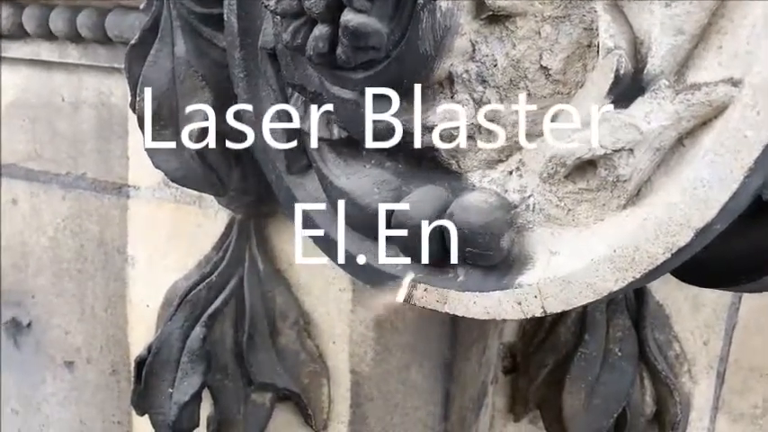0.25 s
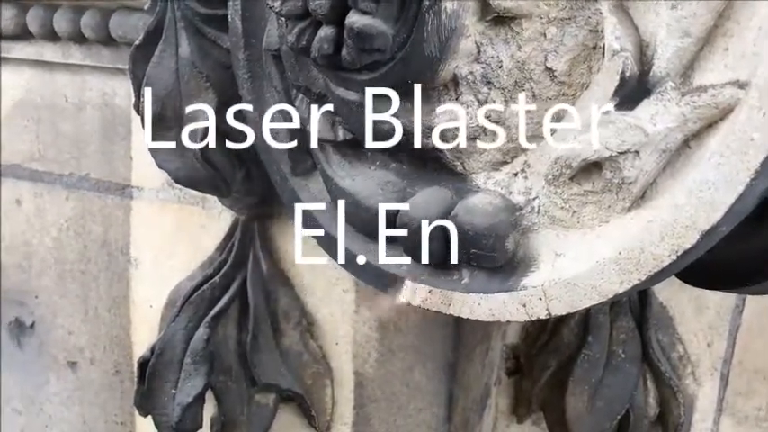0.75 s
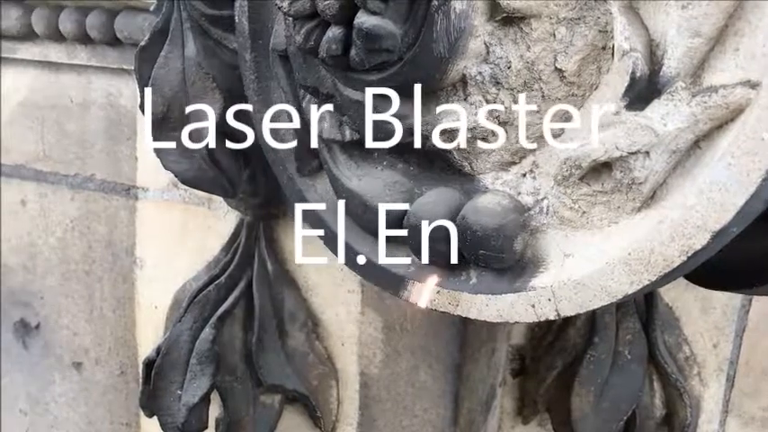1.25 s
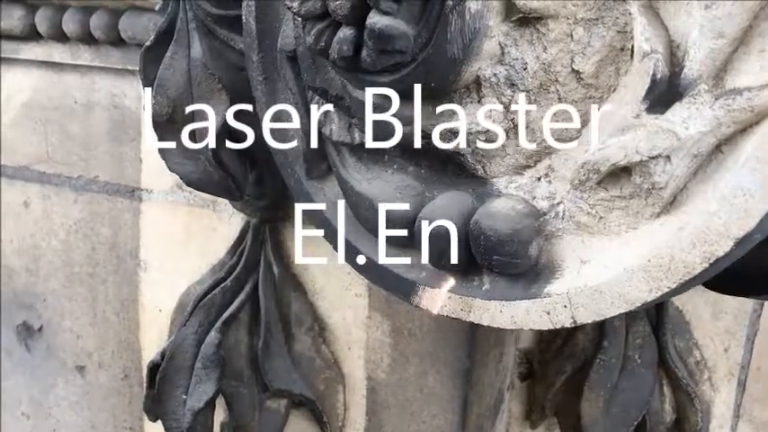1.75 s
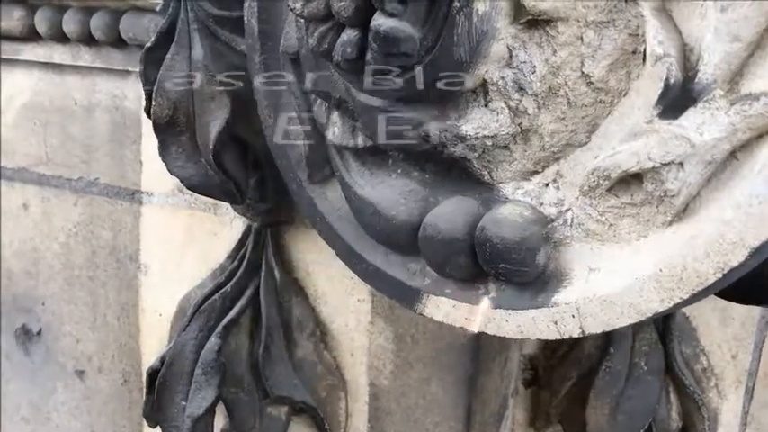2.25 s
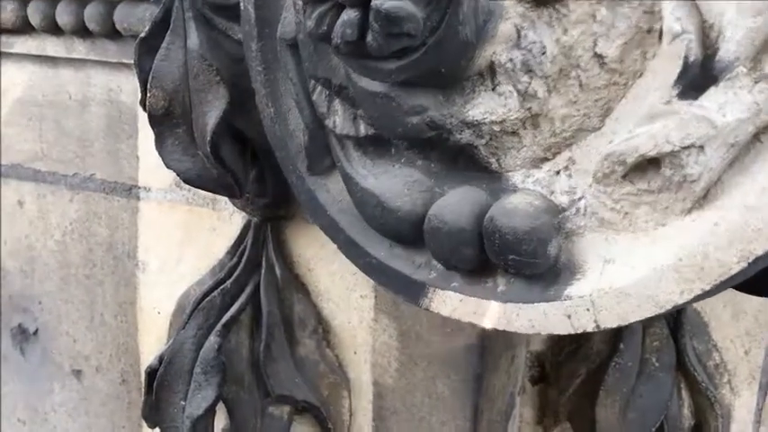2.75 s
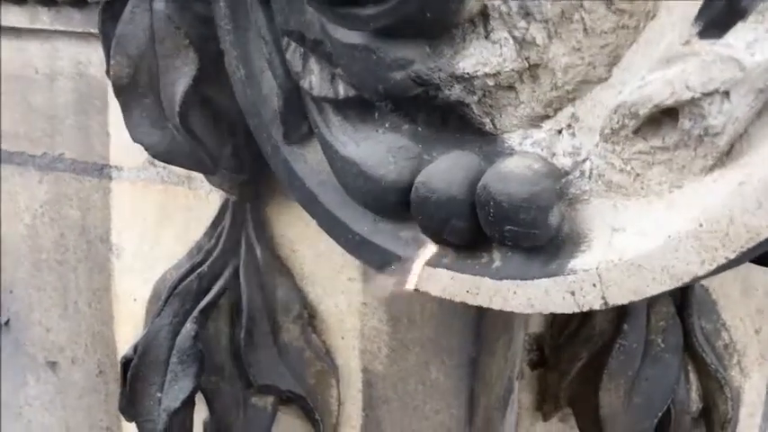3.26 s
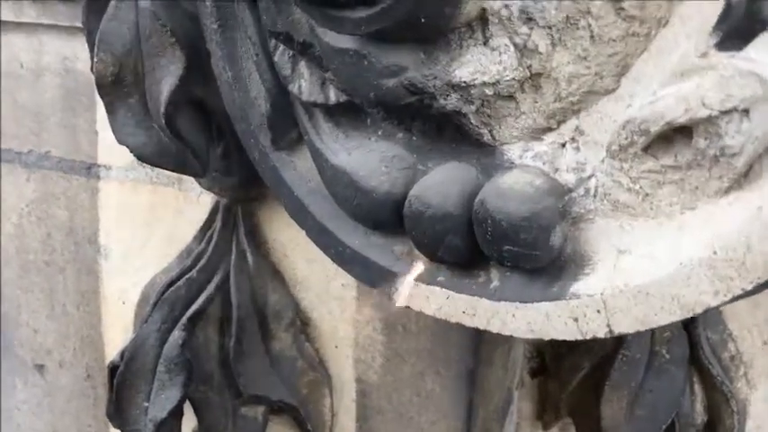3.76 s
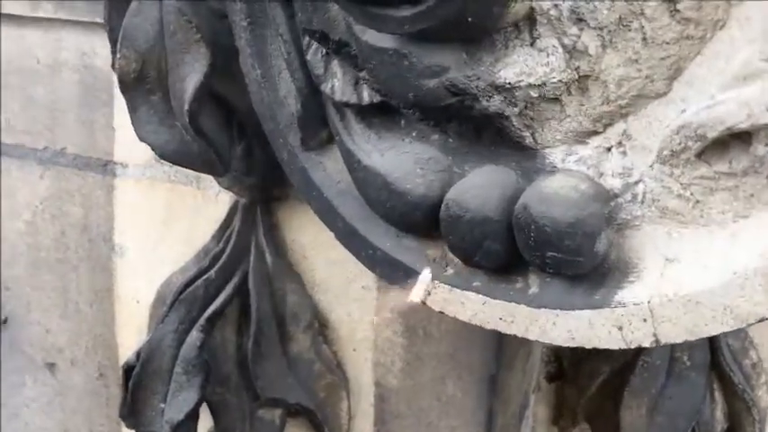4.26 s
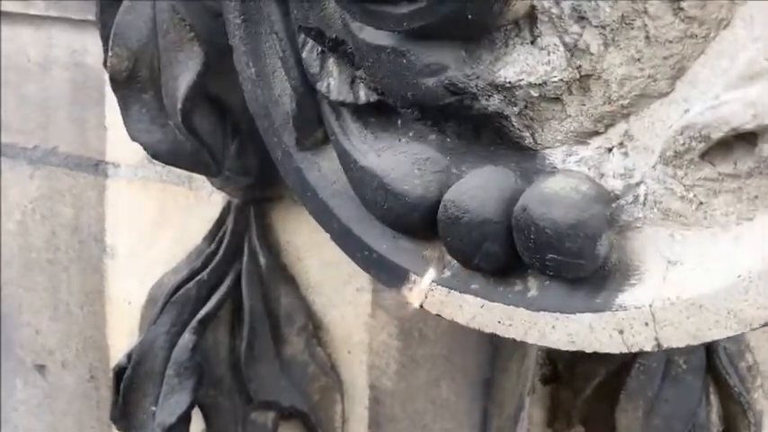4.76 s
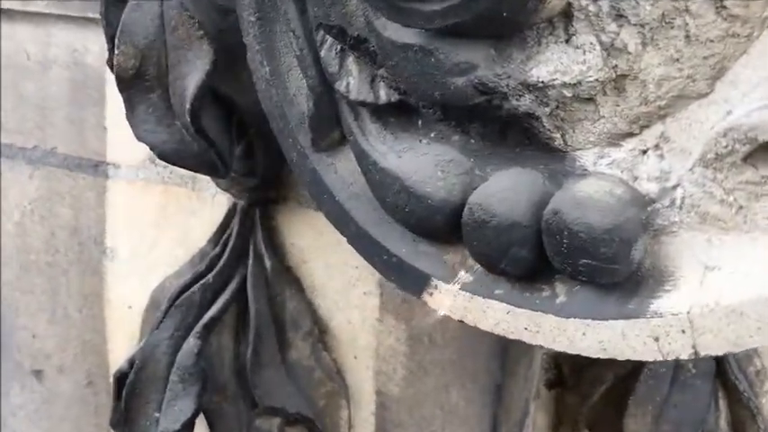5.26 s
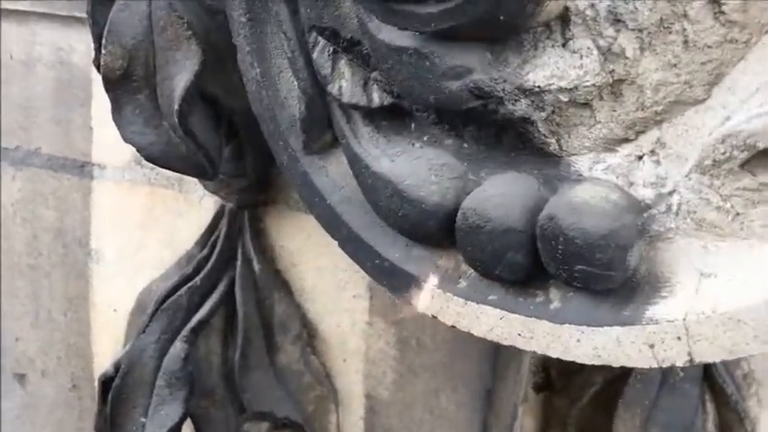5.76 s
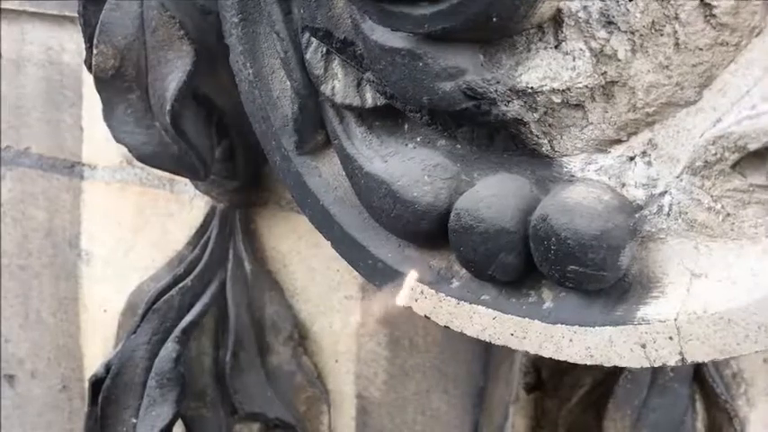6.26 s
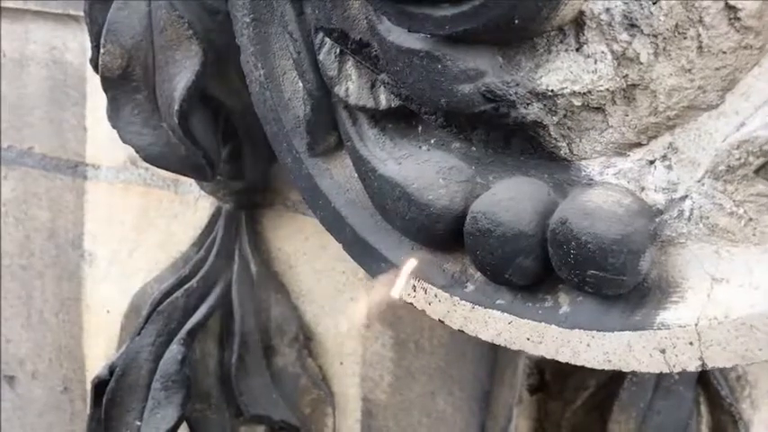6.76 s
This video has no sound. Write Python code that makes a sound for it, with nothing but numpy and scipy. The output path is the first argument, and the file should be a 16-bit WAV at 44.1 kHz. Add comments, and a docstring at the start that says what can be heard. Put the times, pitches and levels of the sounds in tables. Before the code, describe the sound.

Bright, fluttering sizzle and buzz of a laser stripping crust from carved stone outdoors, with occasional snaps and faint street rush.

```python
"""Laser cleaning of a stone facade

A hand-held laser strips soot from a carved rim, outdoors. A mirror sweeps the beam 175 times a second.
Crust bursts off wherever the beam crosses stone, most at the two sooty edges, so the crackle buzzes.
Flakes pop; carvings and wall echo. Behind: low hum of the burn at the sweep rate, a thin whine,
dull bumps, street rush."""
import sys
import numpy as np
from scipy import signal
from scipy.fft import rfft, irfft, next_fast_len
from scipy.io import wavfile
from scipy.ndimage import uniform_filter1d, map_coordinates

SR = 44100
rng = np.random.default_rng(int(sys.argv[2]) if len(sys.argv) > 2 else 0)


def file_out(sig):
    """Save sig as 16-bit WAV at sys.argv[1]."""
    # one column per channel
    cols = np.atleast_2d(sig).T
    # limit, then scale
    lim = np.clip(cols, -1, 1)
    pcm = np.round(lim * 32767).astype(np.int16)
    wavfile.write(sys.argv[1], SR, pcm)


N = 309582
TIME = np.arange(N) / SR
SCAN_HZ, FLUTTER_HZ = 175.0, 24.3
SWEEP_RAD = 2 * np.pi * SCAN_HZ * TIME
RIM_WIDTH = 1.58  # scan line spans -1..1
THICK_CRUST_DB = -23.5  # reference for BURST

# Burst strength of the crust: t/s, level/dB
BURST = [(0.0, -27.5), (0.43, -27.5), (0.6, -24), (0.91, -29.5), (1.13, -23), (1.19, -25), (1.215, -26.5),
         (1.29, -23.5), (1.315, -22.5), (1.45, -26.5), (1.54, -22.5), (1.645, -24.5), (1.665, -27.5),
         (1.73, -29), (1.88, -28.5), (1.95, -25), (2.16, -26.0), (2.7, -25.5), (2.76, -24), (2.86, -23.5),
         (2.93, -27), (3.23, -25), (3.3, -28.5), (3.41, -24.5), (3.65, -25), (3.73, -31), (3.86, -25),
         (3.98, -26.5), (4.06, -33), (4.43, -27), (4.455, -29), (4.54, -30.5), (4.67, -25.5), (5.14, -35.5),
         (5.24, -34.5), (5.33, -33), (5.445, -39), (5.465, -43), (5.532, -49), (5.545, -36), (6.32, -23),
         (7.01, -23)]
# Crackle treble: t/s, gain/dB
TREBLE = [(0, 2.5), (1, 2.5), (2.6, -0.5), (2.85, 1.5), (3, 1), (3.35, 0.5), (3.65, 0.5), (4.1, -1.5),
          (5.5, -2.5), (6.4, -7.5), (6.9, -2)]
# Hand aim: t/s, outer edge position on the scan line
AIM = [(0.0, -0.891), (0.45, -0.83), (0.87, -0.494), (1.03, -0.903), (1.25, -0.47), (1.44, -0.831),
       (1.61, -0.323), (1.76, -0.904), (1.81, -0.945), (2.12, -0.723), (2.39, -0.797), (2.52, -0.709),
       (2.68, -0.821), (2.87, -0.417), (3.05, -0.926), (3.15, -0.964), (3.37, -0.958), (3.57, -0.74),
       (3.84, -0.84), (3.98, -0.761), (4.13, -0.964), (4.34, -0.491), (4.61, -0.307), (5.09, -0.756),
       (5.29, -0.692), (5.5, -0.825), (5.68, -0.778), (5.85, -0.449), (6.12, -0.385), (7.01, -0.685)]
# Flutter shift of the edge crossings: t/s, amplitude/rad
SWAY = [(0, 0.063), (2.3, .06), (3.5, 0.045), (4.4, .022), (7.02, .018)]
# Edge soot relative to beam entry: t/s, exit share, inner edge share
SOOT = [(0, 0.35, 0.59), (1.1, 0.64, 0.45), (1.4, 0.32, 0.45), (4.1, 0.52, 0.58), (4.5, 0.28, 0.32),
        (7.02, .3, 0.34)]
# Place along the rim: t/s, index (0 start, 1 early, 2 middle, 3 end)
PLACE = [(0, 0.5), (1.55, -0.5), (2.05, 1), (2.88, 1), (3.05, 2), (4.5, 3), (6.2, 3), (7.02, 3)]
# Crackle spectrum per place: f/Hz, level/dB
CRACKLE_START = [(100,-13.5), (700,-9.5), (1050,0.5), (1350,-7.5), (1650,-4.5), (2100,-5.5), (2370,-14),
                 (2650,-6.5), (3150,0), (3500,-3), (3675,-8.5), (4200,-0.5), (4550,-11), (4850,-8.5),
                 (5600,-1), (6475,-5.5), (7900,-4), (9450,-3.5), (10400,-8), (11600,-3), (12950,-1.5),
                 (15575,-3)]
CRACKLE_EARLY = [(100,-21), (700,-23), (950,-4), (1320,-12.5), (1650,-3), (2000,-13), (2130,-8), (2380,-24),
                 (2600,1.5), (2720,-5), (3150,-3.5), (3650,-4), (3850,-2.5), (4400,-5.5), (4850,-7),
                 (5425,-2.5), (6050,-4), (7800,-9), (9500,-5.5), (10500,-8.5), (11300,-5), (12600,-2.5),
                 (15575,-4.5)]
CRACKLE_MIDDLE = [(100, -18), (700, -13), (1050, -3), (1225, -11), (1575, -5), (2100, -10.5), (2450, -8.5),
                  (3150, -3.5), (3500, -3), (3675, -7.5), (4200, -8), (4375, -3.5), (4900, -14), (5250, -4),
                  (6125, -4.5), (7525, -7), (9100, -4), (10325, -11), (11725, -4), (14350, -2.5),
                  (15575, -8)]
CRACKLE_END = [(100, -34), (700, -14.5), (1050, -3.5), (1575, -5.5), (2100, -9.5), (2450, -7),
               (2625, -10.5), (3150, -1.5), (3500, -11.5), (4375, -2.5), (4900, -7.5), (5250, -4.5),
               (6125, -1.5), (7700, -7), (9450, -1.5), (10500, -7.5), (11200, 0.2), (12425, -3.5),
               (12950, 4), (15575, -4)]
# Vapour puff spectrum per place: f/Hz, level/dB
VAPOUR_START = [(450,-40),(700,-14.5),(875,3.5),(1050,-2),(1225,-9),(1400,-5.5),(1575,0),(1750,-2),(1925,-7.5),(2100,3.5),(2400,-19),(2625,-0.5),(3150,-6),(3500,-2),(3675,-14),(4025,-2.5),(4200,-7),(6000,-11),(12000,-34)]
VAPOUR_EARLY = [(450,-54),(700,-17.5),(875,4.5),(1050,-8),(1225,-18.5),(1400,-13),(1575,0),(1750,-11),(1925,-15),(2100,-3.5),(2350,-25.5),(2625,-3.5),(2975,-24),(3200,-4.5),(3675,-16),(3850,-4),(4375,-22),(4550,-11),(6000,-14),(12000,-40)]
VAPOUR_MIDDLE = [(450,-48),(700,-14.5),(875,2.5),(1050,-5),(1225,-6.5),(1400,-5),(1575,2),(1750,-3.5),(1925,-12),(2275,-9),(2450,-19),(2625,-4),(2975,-4),(3150,-2),(3325,-14),(3500,-3.5),(3850,-10),(4200,-8),(4550,-8.5),(6000,-12),(12000,-35)]
VAPOUR_END = [(450,-43),(700,-12.5),(875,-4),(1050,-2),(1225,-3.5),(1400,-4),(1575,-0.5),(1750,-5.5),(1925,-10),(2100,-4.5),(2275,-7.5),(2450,-3.5),(2700,-10),(2975,-0.5),(3150,2.5),(3325,-14.5),(3850,-5.5),(4200,-2.5),(4375,-0.5),(4550,-5),(6000,-5.5),(12000,-31)]
# Vapour puffs per place: base level/dB
VAPOUR_DB = [-30, -30, -29, -29]
# Flakes bursting off whole: t/s, snap/dB, thump/dB, ring/dB, burn stall/dB
FLAKES = [(0.764, -1.5, -9.5, -29, -1), (0.7675, -3, -24, -26, 0.5), (0.826, -4, -32, -34, 1),
          (1.078, -19, -16, -35, -6), (1.2416, -2.5, -26, -33, 9), (1.272, -4, -19, -22, 16),
          (1.305, -1.5, -21, -27, 2), (1.312, -2, -19, -27, 5), (1.3254, -18, -12, -30, -1.5),
          (1.379, -22, -28, -34, 1), (1.548, -2.5, -35, -26, 3), (1.5987, -3, -34, -31, 11),
          (1.6349, -0.5, -24, -20, 11), (1.6566, -15, -39, -12.5, 5), (2.806, -8, -15, -35, -2),
          (2.8166, -18, -22, -36, 1), (2.829, -24, -33, -36, 9.5), (2.845, -0.5, -16, -35, 1),
          (2.868, -2, -18, -28, 22), (2.904, -5, -36, -28, 12), (2.931, -4, -39, -34, 5)]
# All-pass corners of the carving: f/Hz
SMEAR_HZ = [500, 1320, 4560]
# Echoes off near carvings: first delay/ms, last delay/ms, gain
CARVINGS = [(.72, 1.3, 0.15), (1.08, 0.87, 0.079), (1.9, 1.3, 0.06)]
# Wall reverberation: f/Hz, T60/s
WALL_T60 = [(200, 0.33), (2000, 0.18), (14000, 0.057)]
# Hum of the burn at the sweep rate: t/s, level/dB
HUM = [(0.0, -51), (0.31, -58), (0.9, -47.5), (1.04, -55), (1.67, -47), (1.74, -56.5), (2.57, -46),
       (2.68, -54), (2.84, -40), (3.3, -57), (3.5, -48), (3.85, -49.5), (4.2, -52), (4.34, -45.5),
       (4.9, -42), (5.0, -48.5), (5.7, -49), (5.89, -39), (7.01, -47.5)]
# Octave of the hum: t/s, level/dB
HUM_OCTAVE = [(0.0, -52), (0.33, -52), (0.73, -54), (1.03, -62), (1.1, -47.5), (1.67, -53.5), (1.7, -45.5),
              (2.77, -46), (2.86, -77), (3.01, -42), (3.32, -56), (3.52, -40.5), (3.78, -61), (3.92, -42.5),
              (4.11, -70), (4.91, -47.0), (5.52, -43.5), (5.7, -67), (5.92, -47), (6.64, -57.5),
              (6.71, -52.5), (7.01, -53.5)]
# Thin whine: t/s, level/dB
WHINE = [(0, -70), (3.2, -48.5), (4.5, -49), (5.2, -50.5), (5.9, -41.5), (6.3, -59), (7.02, -41)]
# Dull bumps: t/s, level/dB, f/Hz
BUMPS = [(.215, -37, 270), (.345, -39, 200), (0.386, -32, 257), (.395, -33, 677), (.455, -37, 303),
         (1.631, -37, 190)]
# Street and cooling fan spectrum: f/Hz, level/dB
STREET = [(20, -32), (36, -10), (52, 1), (68, -3.5), (120, -8.5), (250, -8), (450, -9), (1000, -15.5),
          (2500, -16.5), (8000, -61), (16000, -50)]


def laser(crackle_db=3.0, brightening=0.51, split_hz=7000):
    """Crust burning off: crackle and vapour buzz on the same edge crossings, plus flakes."""
    (burst_db,), (treble_db,), (place,) = curves(BURST), curves(TREBLE), curves(PLACE)
    half_rad, stall_db, tremble = half_arc(), stall(), flutter()
    excess_db = burst_db - THICK_CRUST_DB
    grit = crackle(half_rad)
    lows = signal.filtfilt(*signal.butter(1, split_hz, fs=SR), grit)
    tilt = amp(brightening * excess_db / 2)  # harder bursts are brighter
    body = lows / tilt * amp(-0.56 * stall_db)
    sizzle = (grit - lows) * tilt * amp(treble_db)  # goes on under a loose flake
    crust = amp(burst_db + crackle_db) * tremble * (body + sizzle)
    buzz_db = np.interp(place, np.arange(len(VAPOUR_DB)), VAPOUR_DB) + 0.78 * excess_db - stall_db
    vapour = amp(buzz_db + 0.09 * wobble(30)) * tremble ** 1.44 * vapour_buzz(half_rad)
    return crust + vapour + flakes()


def crackle(half_rad, grains_per_s=4200, plume_share=.25, spread_db=3.1, snap_db=-2, highpass_hz=3800):
    """Soot grains burst at random with the burn rate, a few in the plume; each edge snaps once a pass."""
    rate = burn_rate(half_rad)
    counts = rng.poisson(grains_per_s / SR * (rate / rate.mean() + plume_share))
    grains = np.sqrt(counts) * rng.choice([-1, 1], N)
    grains *= amp(spread_db * rng.standard_normal(N) - 1.6 * wobble(400))
    grains = patchy(grains, depth_db=0.5, width_hz=2370, life_s=.003, size=64)
    snaps = edge_pulses(half_rad, width_rad=.018, rough_db=2.5, scatter_rad=.03)
    snaps = signal.lfilter(*signal.butter(2, highpass_hz, "high", fs=SR), snaps)
    grit = unit(grains) + amp(snap_db) * unit(snaps)
    grit = patchy(grit, depth_db=1.16, width_hz=779, life_s=.16, size=256)
    return colour_by_place(grit, [CRACKLE_START, CRACKLE_EARLY, CRACKLE_MIDDLE, CRACKLE_END])


def vapour_buzz(half_rad):
    """One vapour puff per edge crossing; overtones swell and cancel as the crossings shift."""
    puffs = edge_pulses(half_rad, width_rad=.035, rough_db=.7, scatter_rad=.004)
    puffs = patchy(puffs - puffs.mean(), depth_db=1.6, width_hz=408, life_s=.075, size=512)
    return colour_by_place(puffs, [VAPOUR_START, VAPOUR_EARLY, VAPOUR_MIDDLE, VAPOUR_END])


def half_arc(shake_rad=.0025):
    """Half the sweep angle spent on stone, in rad; set by the aim, rocked by the flutter."""
    (aim,), (sway_rad,) = curves(AIM), curves(SWAY)
    rocking_rad = sway_rad * np.sin(2 * np.pi * FLUTTER_HZ * TIME)
    return np.arccos(np.clip(aim, -.98, .5)) + rocking_rad + shake_rad * wobble(90)


def burn_rate(half_rad, edge_width=.044, outer_soot=4.5, inner_soot=2.2, entry_bias=.4):
    """Relative rate of crust removal as the beam runs over the rim and off into the air."""
    inset = np.cos(SWEEP_RAD) - np.cos(half_rad)  # from the outer edge
    outer, inner = inset / edge_width, (inset - RIM_WIDTH) / edge_width
    edges = outer_soot * np.exp(-outer ** 2) + inner_soot * np.exp(-inner ** 2)
    on_stone = (1 + np.tanh(outer)) / 2
    in_focus = 1 - (1 + np.tanh(inner)) / 4  # the ledge behind the rim burns less
    entry_gain = 1 - entry_bias * np.sin(SWEEP_RAD)  # dust clears while the beam is off the stone
    return (on_stone * in_focus + edges) * entry_gain


def edge_pulses(half_rad, width_rad, rough_db, scatter_rad):
    """One uneven pulse per crossing of the outer or inner edge, four a sweep."""
    exit_share, inner_share = curves(SOOT)
    inner_rad = np.arccos(np.clip(np.cos(half_rad) + RIM_WIDTH, -1, .95))
    crossings = [(-half_rad, 1), (half_rad, exit_share),
                 (-inner_rad, inner_share), (inner_rad, inner_share)]
    out = np.zeros(N)
    for at_rad, share in crossings:
        gain = share * amp(rough_db * wobble(SCAN_HZ))
        offset_rad = SWEEP_RAD - at_rad + scatter_rad * wobble(SCAN_HZ)
        out += gain * np.exp(2 * (np.cos(offset_rad) - 1) / width_rad ** 2)
    return out


def flutter(depth_db=0.9, thin_below_db=-29, flicker_db=.5):
    """Gain of the burn's steady flutter, deeper on thin crust."""
    burst_db, = curves(BURST)
    swing_db = depth_db + 0.31 * np.maximum(thin_below_db - burst_db, 0)
    return amp(swing_db * np.sin(2 * np.pi * FLUTTER_HZ * TIME) + flicker_db * wobble(45))


def flakes(snap_s=.00009, thump_s=.00046, ring_hz=1800, ring_t60_s=.006):
    """A flake leaves with a snap, a gas push that sucks back, and a ring in the carving's hollow."""
    out, t = np.zeros(N + SR), np.arange(SR // 50) / SR
    snap, thump = [(1 - t / tau_s) * np.exp(-t / tau_s) for tau_s in (snap_s, thump_s)]
    ring = np.sin(2 * np.pi * ring_hz * t) * amp(-60 * t / ring_t60_s)
    for at_s, snap_db, thump_db, ring_db, _ in FLAKES:
        pop = amp(snap_db) * snap + amp(thump_db) * thump + amp(ring_db) * ring
        out[round(at_s * SR):][:len(t)] += pop
    return smear(out[:N])


def stall(width_s=0.035):
    """Burn loss in dB while a loose flake shields the stone."""
    return np.max([db * np.exp(-((TIME - at_s) / width_s) ** 2) for at_s, *_, db in FLAKES], axis=0)


def smear(x):
    """The carving smears a crack, lows last: an all-pass chain."""
    for hz in SMEAR_HZ:
        slope = np.tan(np.pi * hz / SR)
        c = (slope - 1) / (slope + 1)
        x = signal.lfilter([c, 1], [1, c], x)
    return x


def facade(x, wet_db=-11):
    """Echoes off near carvings shift as the work moves; the wall adds a short tail."""
    near = x.copy()
    for first_ms, last_ms, gain in CARVINGS:
        delay_samples = np.linspace(first_ms, last_ms, N) * SR / 1000
        near += gain * map_coordinates(x, [np.arange(N) - delay_samples])
    hz, t, noise = signal.stft(rng.standard_normal(SR // 4), SR, nperseg=256)
    decay = amp(-60 * t / log_interp(WALL_T60, hz)[:, None])
    tail = signal.istft(noise * decay, SR, nperseg=256)[1]
    return near + amp(wet_db) * signal.fftconvolve(x, tail / np.linalg.norm(tail))[:N]


def hum_and_whine(whine_hz=1116.0, waver_db=1):
    """The burn's vapour push hums at the sweep rate and two overtones; a thin whine runs beside it."""
    (first_db,), (second_db,) = curves(HUM), curves(HUM_OCTAVE)
    (burst_db,), (whine_db,) = curves(BURST), curves(WHINE)
    third_db = -48.5 + 0.86 * (burst_db - THICK_CRUST_DB) - stall()
    hum = sum(amp(db + waver_db * wobble(7)) * np.sin(k * SWEEP_RAD)
              for k, db in enumerate([first_db, second_db, third_db], 1))
    whine = amp(whine_db) * np.sin(2 * np.pi * whine_hz * TIME + 0.11 * wobble(6.4))
    return np.sqrt(2) * (hum + whine)


def bumps(rise_s=0.0058, width_hz=45):
    """Dull bumps: short swells of low narrowband noise."""
    out = np.zeros(N)
    for at_s, db, hz in BUMPS:
        age = np.maximum(TIME - at_s, 0) / rise_s
        out += amp(db) * age * np.exp(1 - age) * np.sin(2 * np.pi * hz * TIME + wobble(width_hz))
    return out


def street(level_db=-48.5, rise_db=2.5, rise_span_s=(4, 4.8), drift_db=1):
    """Low rush of town and cooling fans, slightly louder late on."""
    db = level_db + np.interp(TIME, rise_span_s, [0, rise_db]) + drift_db * wobble(2.37)
    return amp(db) * unit(coloured(rng.standard_normal(N), STREET))


def colour_by_place(x, spectra):
    """x crossfaded through the spectra along the rim, held at rms 1 over eight sweeps."""
    place, = curves(PLACE)
    place = np.clip(place, 0, len(spectra) - 1)
    mix = sum(np.maximum(1 - np.abs(place - k), 0) * unit(coloured(x, spectrum))
              for k, spectrum in enumerate(spectra))
    power = uniform_filter1d(mix * mix, size=8 * round(SR / SCAN_HZ))
    return mix / np.sqrt(np.abs(power) + 1e-12)


def patchy(x, depth_db, width_hz, life_s, size):
    """x with random gain patches in frequency and time."""
    hz, t, spectrum = signal.stft(x, SR, nperseg=size)
    rows, cols = np.meshgrid(hz / width_hz, t / life_s, indexing="ij")
    knots = rng.standard_normal((int(rows.max()) + 2, int(cols.max()) + 2))
    gain_db = depth_db * unit(map_coordinates(knots, [rows, cols], order=1))
    return signal.istft(spectrum * amp(gain_db), SR, nperseg=size)[1][:N]


def coloured(x, points, size=8192):
    """x through a minimum-phase filter given as f/Hz, gain/dB."""
    cepstrum = irfft(np.log(amp(log_interp(points, np.fft.rfftfreq(size, 1 / SR)))))
    cepstrum[1:size // 2] *= 2
    cepstrum[size // 2 + 1:] = 0
    impulse = irfft(np.exp(rfft(cepstrum)))[:size // 2]
    return signal.fftconvolve(x, impulse)[:N]


def wobble(rate_hz):
    """Smooth random curve, knots at rate_hz."""
    return map_coordinates(rng.standard_normal(int(N * rate_hz / SR) + 4), [TIME * rate_hz])


def curves(rows):
    """One per-sample curve for each column after t/s."""
    times_s, *columns = np.transpose(rows)
    return [np.interp(TIME, times_s, column) for column in columns]


def log_interp(points, hz):
    """Interpolate f/Hz, value points on a log axis."""
    knots_hz, values = np.transpose(points)
    return np.interp(np.log(hz + 1), np.log(knots_hz + 1), values)


def amp(db):
    """dB to gain."""
    return 10 ** (np.asarray(db) / 20)


def unit(x):
    """x at rms 1."""
    return x / np.sqrt(np.mean(x ** 2) + 1e-20)


def scene():
    """Laser at the facade with its hum, whine, bumps and street; mono."""
    return (amp(-1.5) * facade(laser()) + hum_and_whine() + bumps() + street())[None]


def record(dry):
    """Brick-wall low-pass."""
    cutoff_hz = 15800
    size = next_fast_len(N + SR // 2)
    passband = np.fft.rfftfreq(size, 1 / SR) < cutoff_hz
    return irfft(rfft(dry, size) * passband, size)[..., :N]


dry = scene()
out = record(dry)
file_out(out)
```